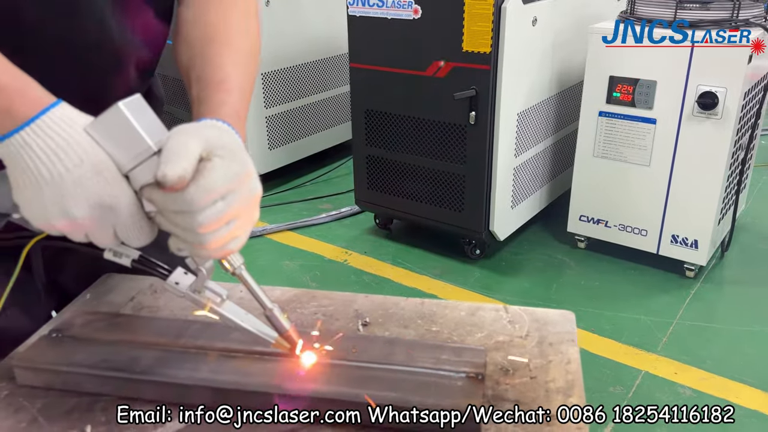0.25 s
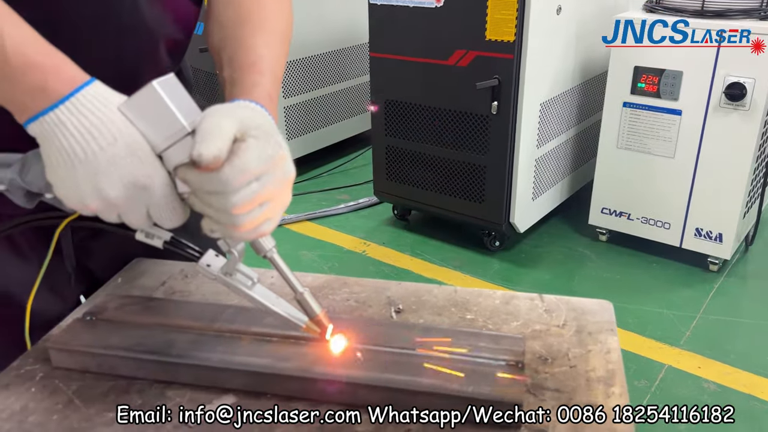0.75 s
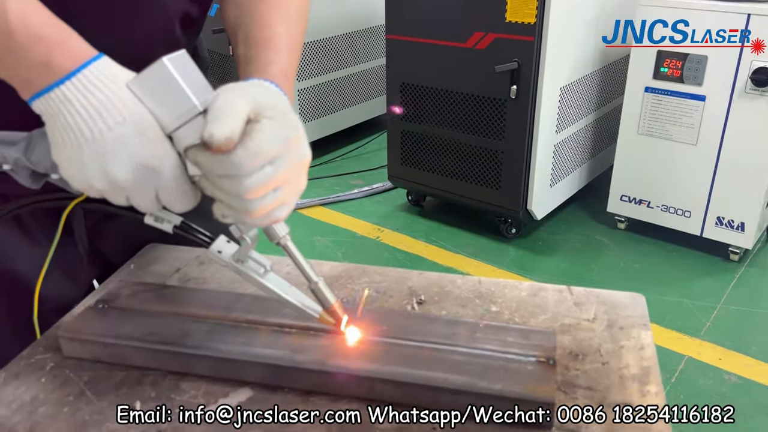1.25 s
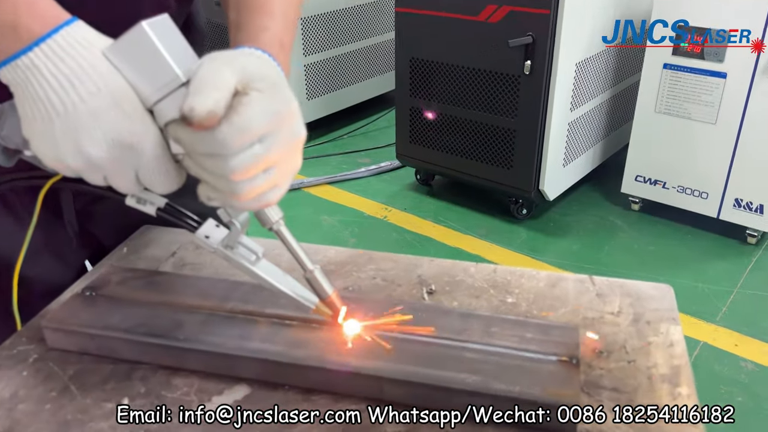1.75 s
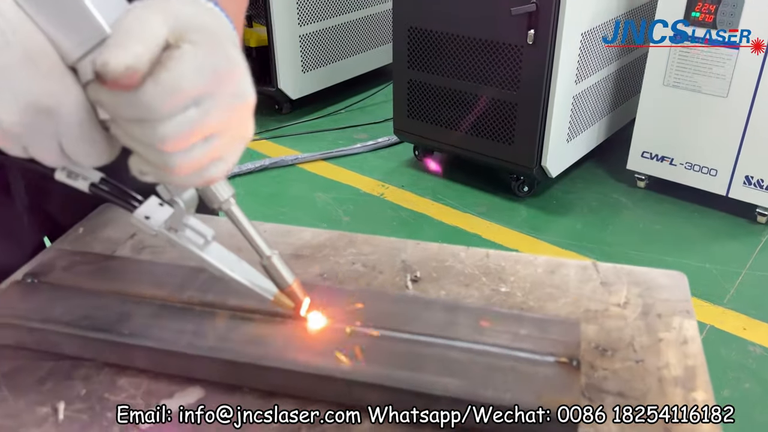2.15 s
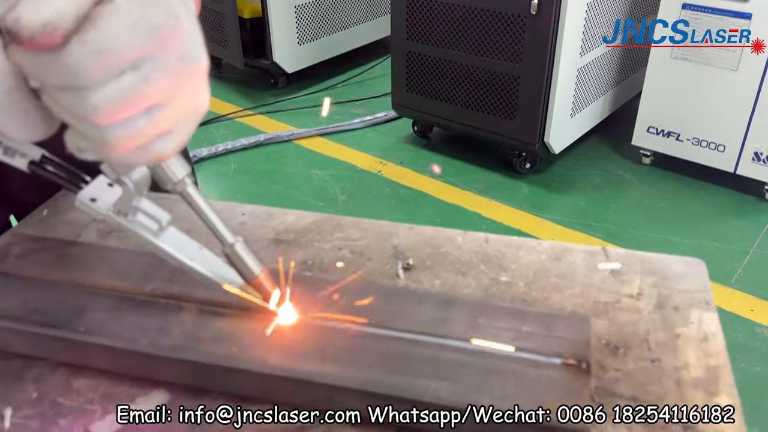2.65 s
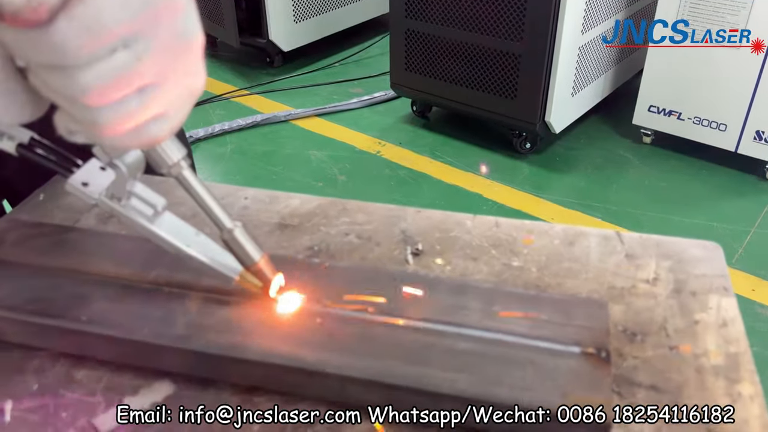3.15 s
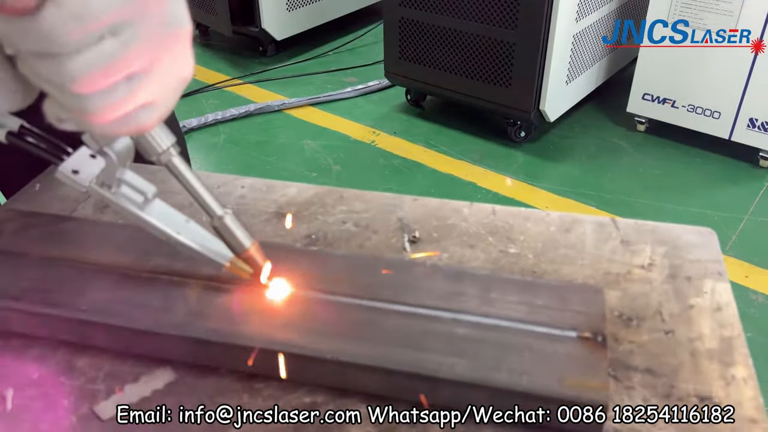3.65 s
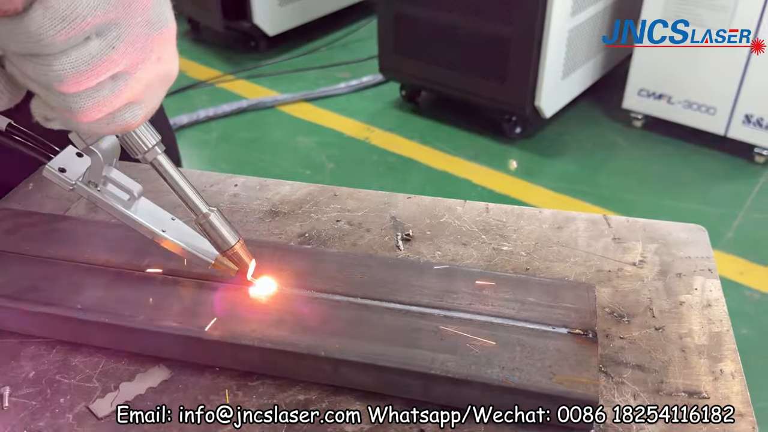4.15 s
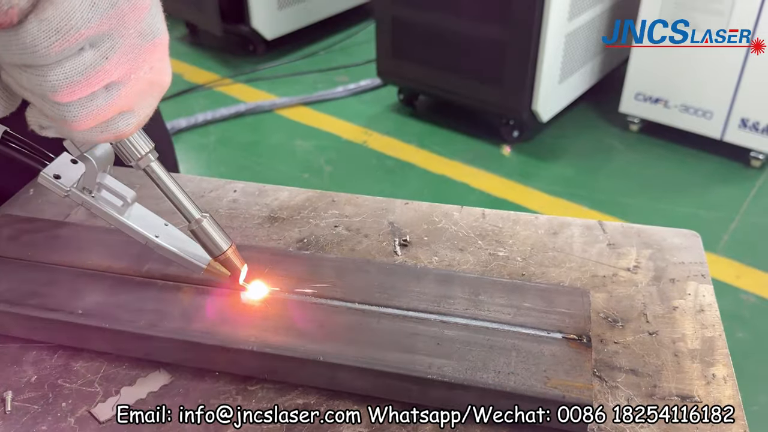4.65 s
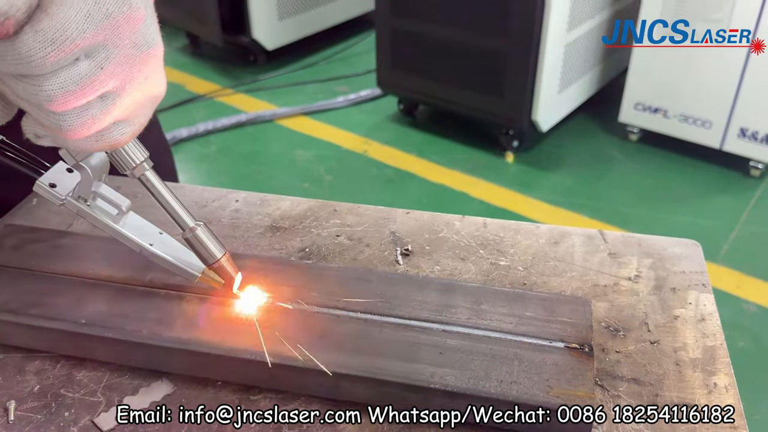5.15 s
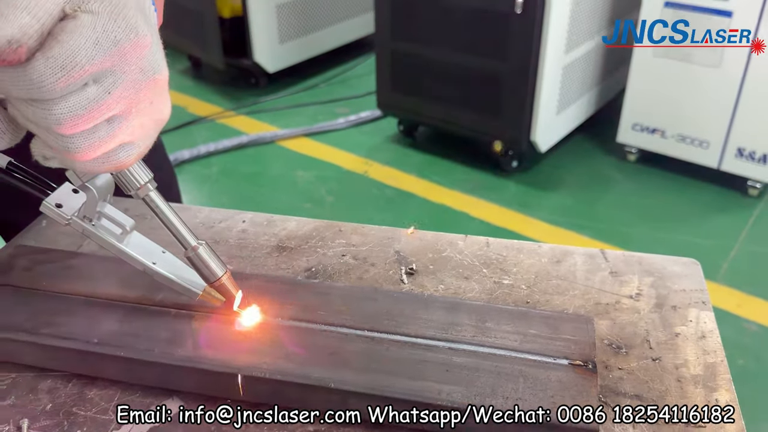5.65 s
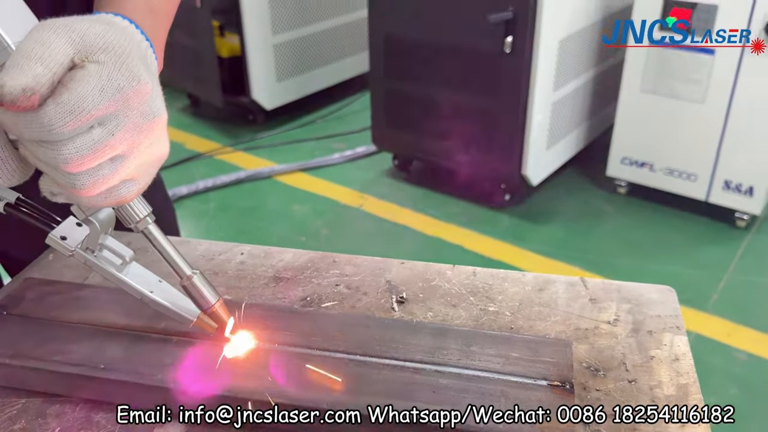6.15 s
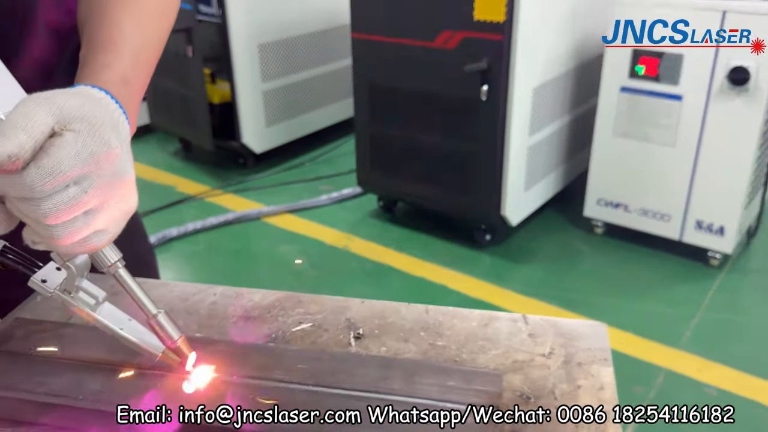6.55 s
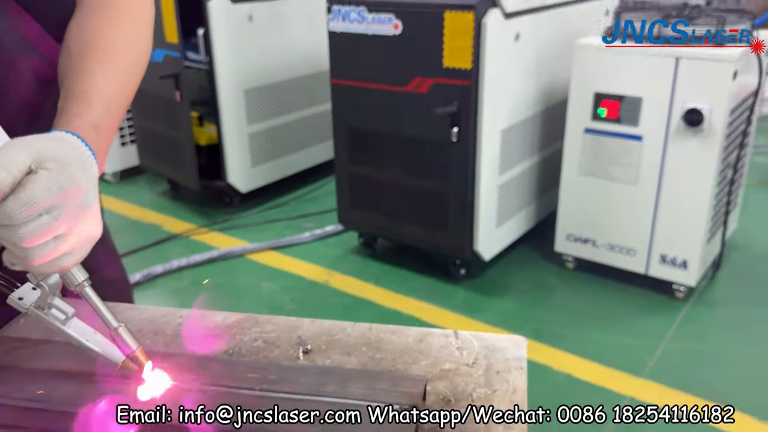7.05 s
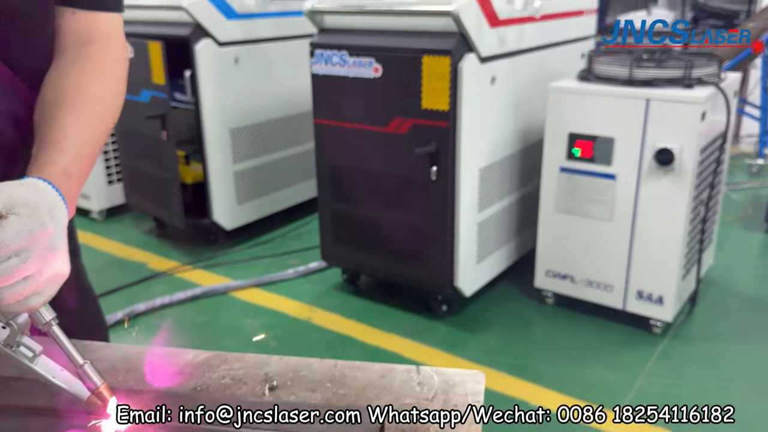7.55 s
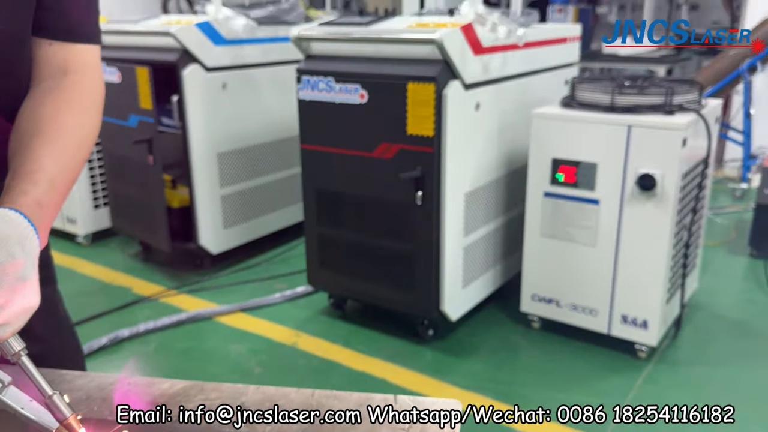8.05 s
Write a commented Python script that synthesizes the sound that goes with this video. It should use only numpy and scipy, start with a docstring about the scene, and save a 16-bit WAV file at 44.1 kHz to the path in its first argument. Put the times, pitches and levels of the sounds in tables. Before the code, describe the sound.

Bright, rasping jet hiss from a laser welding torch flutters rapidly at close range, small crackles inside it, with quiet cabinet fans humming behind.

```python
"""A handheld laser welder runs along a steel seam: its vapour jet is filtered noise with tiny bursts and spatter pops.
The beam wobbles across the seam 34 times a second, and each sweep repeats the same swells: a fast flutter.
Chiller and cabinet fans drone behind, made of filtered noise and wavering sine tones; the phone is softly bumped.
The phone moves in close and draws back; plate reflections and the shading of one port (sound opening) sweep the hiss."""
import sys
import numpy as np
from scipy import signal
from scipy.fft import rfft, irfft, next_fast_len
from scipy.io import wavfile

SR = 44100
rng = np.random.default_rng(int(sys.argv[2]) if len(sys.argv) > 2 else 0)


def generate_wav(signal):
    """Clip the signal to [-1, 1] and save it as 16-bit WAV at the path in sys.argv[1]."""
    frames = np.transpose(np.atleast_2d(signal))
    scaled = np.clip(frames, -1, 1) * 32767
    pcm = np.round(scaled).astype(np.int16)
    wavfile.write(sys.argv[1], SR, pcm)


N = 366471
TIME = np.arange(N) / SR  # the time of every sample, in s


def undb(db):
    """Turn decibels into a gain."""
    return 10 ** (np.asarray(db) / 20)


def unit(x):
    """Scale a sound to an average (rms) strength of 1."""
    return x / np.sqrt(np.mean(x ** 2))


def curves(table, t=TIME):
    """Return each column after the time, joined by straight lines."""
    s, *columns = np.transpose(table)
    return [np.interp(t, s, column) for column in columns]


def colour(x, points):
    """Filter a sound by (frequency [Hz], level [dB]) points, then scale it to rms 1."""
    hz, db = np.transpose(points)
    size = next_fast_len(N, True)
    f = np.fft.rfftfreq(size, 1 / SR) + 1  # the 1 avoids the logarithm of zero
    gain = undb(np.interp(np.log(f), np.log(hz), db))
    return unit(irfft(rfft(x, size) * gain, size)[..., :N])


def walk(rate):
    """Wander at random, with this many new values a second joined by lines and a spread near 1."""
    steps = rng.standard_normal(20000)
    return 1.272 * np.interp(TIME * rate, np.arange(len(steps)), steps)


def bell(x, centre, width):
    """Draw a smooth hump of height 1."""
    return np.exp(-.5 * ((x - centre) / width) ** 2)


def delayed(fine, lag_ms):
    """Read a four times oversampled sound at a moving delay."""
    position = np.rint(4 * SR * (TIME - lag_ms / 1000)).astype(int)
    return np.take(fine, position, mode="wrap")


# colour of the fans' air noise: (frequency [Hz], relative level [dB per Hz])
FAN_COLOUR = [(25, -30), (60, -16.5), (100, -9.5), (138, -4.5), (162, -7.5), (184, -3.5), (222, -2),
              (250, -7.5), (295, -11), (350, -9.5), (500, -13), (640, -11), (820, -21), (1100, -21),
              (3000, -80)]
# colour of the fan noise that differs between the ports: (frequency [Hz], relative level [dB per Hz])
FAN_SIDE_COLOUR = [(25, -14), (60, -4.5), (110, -1), (200, 1.2), (300, -2.5), (650, -2.5), (1000, -7.5),
                   (3000, -17), (12000, -35)]
# tones of motors and blades: (centre frequency [Hz], relative level [dB])
HUM_TONES = [(183.2, -44.5), (346, -52), (411, -57.5), (440, -50.5), (652, -61.5), (118.5, -56)]
# resonance of the cabinet: (frequency [Hz], relative level [dB per Hz])
DRONE_COLOUR = [(120, -48), (175, -10), (196, 5), (220, -10), (300, -50), (1000, -80)]
# level of the fans: (time [s], level [dB])
FAN_LEVEL = [(0, -1.3), (2.1, 0.3), (2.6, 2), (2.9, -0.15), (8.3, -3.5)]


def fans(air_db=-35.0, side_db=-10, rush_db=2.13, hum_db=-1.0, wander_hz=2.6,
         surge_db=0.3, drone_db=-42, throb_db=1.0):
    """Air rushes through the cabinets as noise; a resonance throbs, and motor tones waver in pitch."""
    level_db = curves(FAN_LEVEL)[0] + surge_db * walk(7)
    mid = colour(rng.standard_normal(N), FAN_COLOUR + [(12000, -73)])
    side = colour(rng.standard_normal(N), FAN_SIDE_COLOUR)
    opposite = np.array([[1], [-1]])  # the side noise has the opposite sign at the other port
    air = undb(air_db) * (mid + undb(side_db) * side * opposite)
    above_bass = signal.butter(2, 280, "high", fs=SR, output="sos")
    rush = (undb(rush_db) - 1) * signal.sosfiltfilt(above_bass, air)

    hum = 0
    for hz, db in HUM_TONES:
        phase = 2 * np.pi * np.cumsum(hz + wander_hz * walk(6)) / SR
        hum = hum + undb(db + hum_db) * unit(np.sin(phase))

    drone = unit(undb(throb_db * walk(11)) * colour(rng.standard_normal(N), DRONE_COLOUR))
    # the drone follows only half of the level changes
    return undb(level_db) * (air + rush + hum) + undb(drone_db + level_db / 2) * drone


def bump(at_s=2.664, width_s=0.012, level_db=-27):
    """The hand bumps the phone: a short dull knock of low noise comes through its case."""
    dull = [(60, -31), (220, 16), (450, -8), (1000, -5), (2000, -32), (8000, -60)]
    thud = colour(rng.standard_normal(N), dull)
    return undb(level_db) * thud * bell(TIME, at_s, width_s)


NEAR_M = .3  # the distance that counts as 0 dB of closeness
# the phone moves in and draws back: (time [s], distance from the weld [m])
DISTANCE = [(0, 0.42), (1.4, 0.41), (2.1, 0.32), (3.1, 0.26), (4.6, 0.3), (6.3, .34), (7.2, 0.44),
            (8.3, 0.41)]


def closeness(t=TIME):
    """Tell how much nearer the phone is than NEAR_M, in dB."""
    return 20 * np.log10(NEAR_M / curves(DISTANCE, t)[0])


# how the phone faces the weld: (time [s], turn [0 = facing it, 1 = side-on])
FACING = [(0, 0.2), (1.2, -0.12), (2.2, -0.051), (2.4, 0.088), (2.55, 0.64), (2.75, 0.75), (3.1, 0.81),
          (6.1, 1), (6.8, 1.27), (7.35, 1.22), (7.62, 1.3), (7.8, 1.08), (8.3, 1.2)]


def turned(start, change, t=TIME):
    """Shift a quantity in proportion to the phone's turn."""
    return start + change * curves(FACING, t)[0]


def workshop(x, t60=0.14):
    """The hall's blurred tail is noise that follows the weld's power, unrelated at each port."""
    age = np.arange(SR // 2) / SR
    fade = undb(-60 * age / t60) ** 2  # the power falls by 60 dB in t60 seconds
    power = np.abs(signal.fftconvolve(x ** 2, fade)[:N])
    noise = rng.standard_normal((2, N))
    return colour(np.sqrt(power) * noise, [(40, -40), (150, -25)] + list(HISS_COLOUR))


# short echoes off torch, glove, plate and bench:
# (delay at NEAR_M [ms], slide [ms per dB of closeness], gain [ratio])
ECHOES = [(0.544, .009, 0.091), (.75, 1.54, -.08), (1.0, 0.5, -0.033), (1.2, 0, -0.14), (1.474, 0.1, 0.15),
          (1.94, -0.6, 0.052), (2.143, -2.5, 0.25), (6, 1, -0.0046)]


def reflections(x, echo_db=0, slide_ms_per_db=.5, count=14):
    """Nearby things echo the hiss and farther ones scatter it; rows: direct, left and right scatter."""
    near_db = closeness()
    fine = signal.resample_poly(x, 4, 1)  # finer steps let the delays slide smoothly
    echoes = sum(gain * delayed(fine, ms + slide * near_db) for ms, slide, gain in ECHOES)
    sway_ms = slide_ms_per_db * near_db + .02 * walk(1.5)
    # for each port: pairs of a delay in ms and its share of the sway
    paths = rng.uniform([2.5, -.7], [12, .7], (2, count, 2))
    left, right = (unit(sum(delayed(fine, lag + share * sway_ms) for lag, share in rows)) for rows in paths)
    return unit(x + undb(echo_db) * echoes), left, right


def notch(f, hz, width_hz, depth_db):
    """A cavity swallows one frequency, and the phase swings across it (complex gain)."""
    detune = 1j * (f - hz) / width_hz
    return (detune + undb(-depth_db)) / (detune + 1)


# bands in which the ports oppose each other:
# (time [s], lower band [Hz], its share [0-1], upper band [Hz], its share [0-1])
HOLLOW = [(0, 4970, 0.05, 8400, 1), (.45, 5200, 0, 8500, .95), (.65, 5260, 0.1, 8600, 0.26),
          (1.55, 5160, 0.1, 9000, 0.33), (1.8, 4900, 0.2, 8840, 0.97), (2.35, 4600, 0.2, 8760, 0.97),
          (2.55, 3100, 0.1, 8300, 1), (2.8, 3160, 1, 8450, 1), (3.0, 2840, 1, 8400, 1),
          (6.15, 2880, 1, 8370, 1), (6.7, 2840, 0.3, 8500, 0.35), (7.3, 2080, 0.4, 8500, 0.24),
          (7.7, 1990, 0.14, 8300, 0.3), (7.8, 3080, .95, 7260, 0.2), (8.3, 2930, 0.6, 5700, 0.64)]


def opposition(f, t, low_width_hz=280, high_width_hz=700):
    """Give the share of opposite phase at the ports: two bands in which the hiss sounds hollow."""
    def band(hz, width_hz):
        return 1 / (1 + ((f - hz) / width_hz) ** 6)

    low_hz, low, high_hz, high = curves(HOLLOW, t)
    return np.clip(low * band(low_hz, low_width_hz) + high * band(high_hz, high_width_hz), 0, 1)


# a broad rise of the hiss near 8 kHz: (time [s], centre [Hz], lift [dB])
PRESENCE = [(0, 7950, 4.5), (.9, 7800, 1.5), (2.2, 7900, 3.5), (4.5, 7800, 2.5), (6.2, 7750, 5.5),
            (7.2, 7470, 7), (7.7, 7500, 8), (8.3, 7500, 6)]
# the jet flares up, mostly in its middle range: (time [s], width [s], lift [dB])
FLARES = [(.78, 0.047, 2.5), (4.33, 0.22, 3), (7.88, 0.11, 1)]


def radiation(f, t, near_gain=1, body_db=0.94, flare_hz=4330, flare_width_hz=1750,
              bright_db=4, bright_db_per_s=-0.5, top_db=-3, top_db_per_s=0.4,
              dip_hz=14000, dip_slide_hz_per_db=520, dip_width_hz=330, dip_db=6):
    """The hiss is louder when near or flaring, and its colour follows the angle of the jet (gain in dB)."""
    near_db = closeness(t)
    presence_hz, presence_db = curves(PRESENCE, t)
    body = body_db * bell(f, 1660, 610)
    presence = presence_db * bell(f, presence_hz, 860)
    # the treble dulls as the torch travels along the seam
    bright = (bright_db + bright_db_per_s * t) * bell(f, 13600, 1300)
    flare = sum(db * bell(t, s, width) for s, width, db in FLARES) * bell(f, flare_hz, flare_width_hz)
    # the very top slowly opens up
    top = (top_db + top_db_per_s * t) * np.clip((f - 13500) / 2000, 0, 1)
    # a dip in the top octave slides down as the phone comes near
    dip = dip_db * bell(f, dip_hz - dip_slide_hz_per_db * near_db, dip_width_hz)
    return near_gain * near_db + flare + body + presence + bright + top - dip


# phase by which the left port leads when the phone faces the weld: (frequency [Hz], lead [radians])
LEAD_FACING = [(600, -0.5), (2500, 0.8), (3100, 1.5), (4000, 1.1), (4700, 2), (5200, 3.5), (6200, 7),
               (7000, 8), (7900, 10), (9000, 8.5), (10000, 8.5), (15000, 7)]
# the same lead when the phone is side-on: (frequency [Hz], lead [radians])
LEAD_SIDE_ON = [(600, 0), (2200, 1.63), (2850, 3.5), (3700, 4.5), (4750, 6), (5900, 7), (7100, 8),
                (7900, 9.5), (9000, 10), (10000, 9), (15000, 7.5)]
# colour of the shaded right port:
# (time [s], notch [Hz], notch depth [dB], resonance height [dB], level below the top range [dB])
SHADING = [(0, 6760, 0.5, 5, -0.5), (2.15, 6800, 2, 5.5, 0.5), (2.35, 5800, 12, -4, 1.5),
           (2.66, 6140, 6, 1, -1.5), (2.8, 6400, 4, 0.5, 4), (3.1, 5900, 10, 5.5, -2),
           (4.3, 6030, 18, 6.5, 0.5), (6.1, 6370, 10, 7.5, -0.5), (7.4, 5900, 12, 7, -.5),
           (7.64, 5500, 9, 0, -2.5), (7.72, 6800, 20, 4, 2.5), (7.82, 7700, 2, 6.5, 1),
           (8.3, 7240, 8, 9.5, .5)]


def ports(direct, room, room_at_near_db=-3.5, near_dry=0.41, lift_width_hz=380,
          dip_hz=3900, dip_width_hz=170, dip_db=4, shade_top_hz=7500):
    """The two ports hear the weld with different phase; the right one has a moving resonance and notch."""
    # coming closer weakens the room against the direct sound, by near_dry dB per dB of closeness
    room_db = room_at_near_db - near_dry * closeness()
    both = np.vstack([direct, undb(room_db) * room]) / np.sqrt(1 + undb(2 * room_db))
    f, t, (near, far_left, far_right) = signal.stft(both, SR, nperseg=512)
    f = f[:, None]

    facing = np.interp(f, *np.transpose(LEAD_FACING))
    side_on = np.interp(f, *np.transpose(LEAD_SIDE_ON))
    lead = turned(facing, side_on - facing, t)
    left = near + far_left
    right = near * np.exp(-1j * lead) + far_right

    shade_hz, shade_db, lift_db, right_db = curves(SHADING, t)
    right = right * notch(f, shade_hz, turned(910, 220, t), shade_db)
    lift = lift_db * bell(f, turned(4590, 330, t), lift_width_hz)
    dip = turned(0, dip_db, t) * bell(f, dip_hz, dip_width_hz)
    low_dip = 2 * bell(f, 1100, 660)
    level = right_db * np.clip((shade_top_hz - f) / 2000, 0, 1)
    right = right * undb(lift - dip - low_dip + level)

    opposed = opposition(f, t)
    right = (1 - opposed) * right - opposed * left
    heard = np.array([left, right]) * undb(radiation(f, t))
    return signal.istft(heard, SR)[1][:, :N]


# the jet swells as the beam crosses the joint:
# (place in the sweep [share of a sweep], width [share of a sweep], lift [dB])
CROSSINGS = [(.265, 0.09, 11), (.582, 0.023, 7.5), (.81, 0.093, 8)]


def wobble(sweeps_hz=34.427, first_start=.11, trough_db=-4.8, rise_ratio=1.36):
    """Every sweep of the beam repeats the same swells of the jet (strength in dB)."""
    sweeps = TIME * sweeps_hz - first_start
    level_db = trough_db
    for at, width, db in CROSSINGS:
        past = (sweeps - at + .5) % 1 - .5  # how far the beam is past the crossing
        # a swell builds more slowly than it falls
        level_db = level_db + db * bell(past, 0, width * np.where(past < 0, rise_ratio, 1))
    return level_db


# colour of the vapour jet: (frequency [Hz], relative level [dB per Hz])
HISS_COLOUR = [(300, -15.5), (1000, -10.5), (1500, -7), (2400, -10.5), (3000, -9), (3450, 1), (5400, 1),
               (6500, -1.5), (8300, -4.5), (9600, 0.5), (10600, -3), (12600, -3), (13900, -8.5),
               (15600, -10.5)]
# spatter pops: (time [s], relative level [dB])
POPS = [(1.693, -15), (1.781, -15), (2.886, -10), (3.089, -8), (3.567, -9), (3.784, -13), (4.3076, -7),
        (4.366, -8), (4.394, -9), (4.51, -7), (4.597, -7), (5.035, -11), (5.295, -11), (5.6725, -10),
        (5.905, -5), (6.0784, -7), (6.3986, -14), (6.8354, -9)]


def jet(rough_db=1.0, flicker_db=0.41, bursts_per_s=1800, crackle_db=-7, grain_db=1.5,
        pop_db=23, pop_rise_s=0.00046, pop_s=0.0018, shield_db=-8):
    """Vapour hiss and tiny melt bursts swell with each sweep; pops are added, shielding gas flows evenly."""
    strength = undb(wobble() + rough_db * walk(450) + flicker_db * walk(30))
    happens = rng.random(N) < bursts_per_s / SR
    size_db = grain_db * np.minimum(rng.exponential(size=N), 4.5)
    bursts = happens * undb(size_db) * rng.choice([-1, 1], N)
    vapour = unit(strength * (rng.standard_normal(N) + undb(crackle_db) * unit(bursts)))

    # each drop of melt blows out within a few milliseconds
    age = np.arange(512) / SR
    for s, level_db in POPS:
        start = int(s * SR)
        envelope = (1 - np.exp(-age / pop_rise_s)) * np.exp(-age / pop_s)
        pop = undb(level_db + pop_db) * envelope * rng.uniform(-1.35, 1, len(age))
        vapour[start:start + len(age)] += pop[:N - start]

    shield = colour(rng.standard_normal(N), [(1000, -14), (5000, -9.5), (9000, 4.0), (16000, -7.5)])
    return colour(vapour + undb(shield_db) * shield, [(40, -52), (150, -20)] + list(HISS_COLOUR))


# colour of the scattered sound and the hall: (frequency [Hz], relative level [dB])
ROOM_COLOUR = [(300, -2), (1800, 1), (2400, 6), (2900, 5.5), (3600, -4.5), (6800, -0.5), (8400, -3),
               (10000, -3.5), (12000, -0.5), (14500, 4.5)]


def scene(hall_db=-4, hiss_db=-19.5):
    """Put the weld close by and the machines behind it."""
    weld = jet()
    direct, *scatter = reflections(weld)
    room = colour(np.array(scatter) + undb(hall_db) * workshop(weld), ROOM_COLOUR)
    return fans() + bump() + undb(hiss_db) * ports(direct, room)


def record(dry, top_hz=15750):
    """The phone rounds the sharpest peaks and cuts the top."""
    rounded = .9 * np.tanh(dry / .9)
    top_cut = signal.ellip(12, .1, 80, top_hz, fs=SR, output="sos")
    return signal.sosfilt(top_cut, rounded)


dry = scene()
out = record(dry)
generate_wav(out)
```